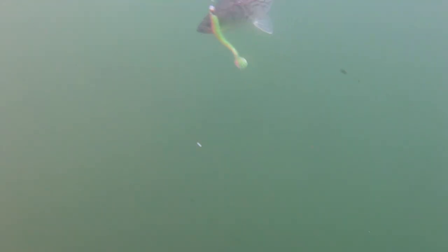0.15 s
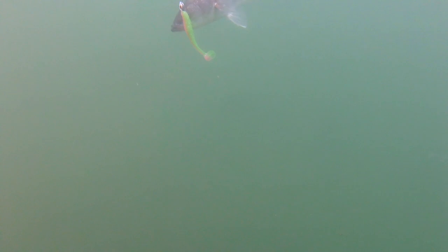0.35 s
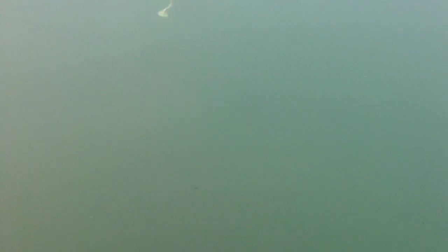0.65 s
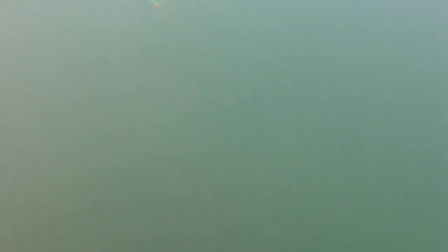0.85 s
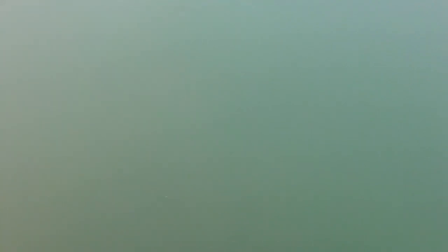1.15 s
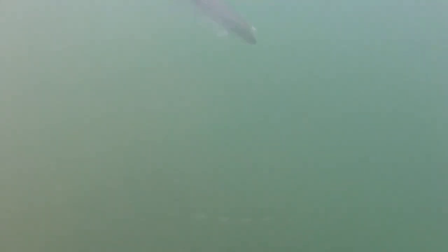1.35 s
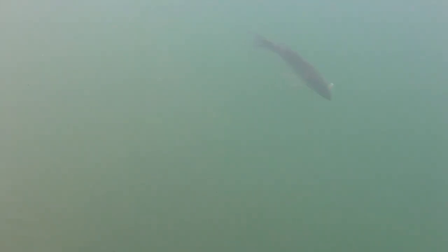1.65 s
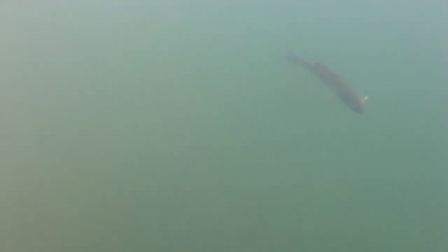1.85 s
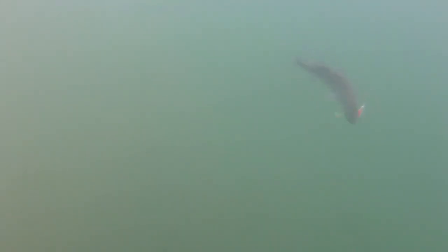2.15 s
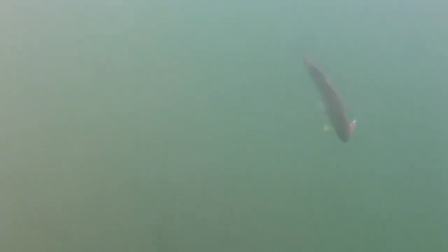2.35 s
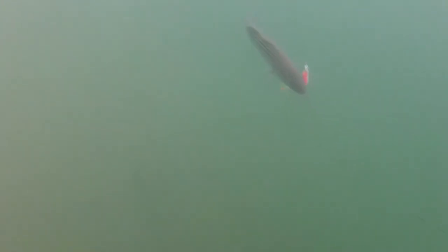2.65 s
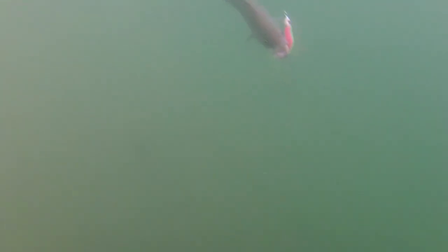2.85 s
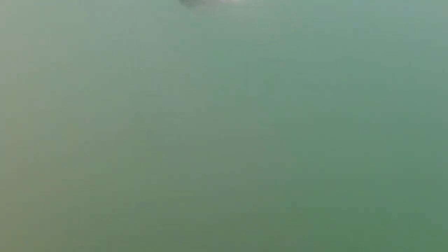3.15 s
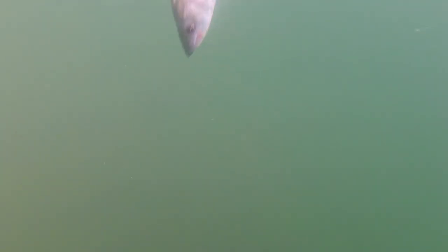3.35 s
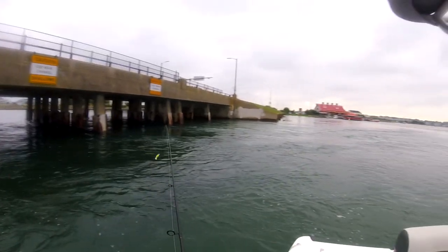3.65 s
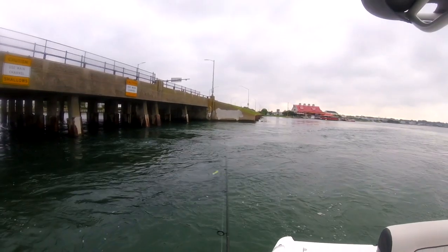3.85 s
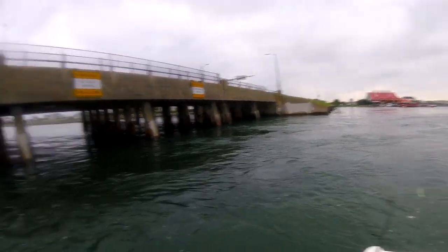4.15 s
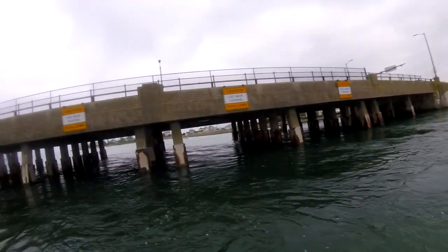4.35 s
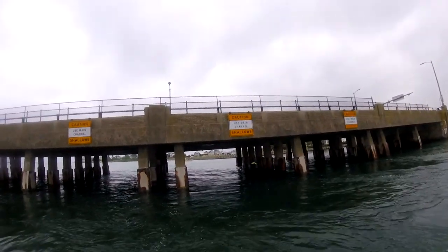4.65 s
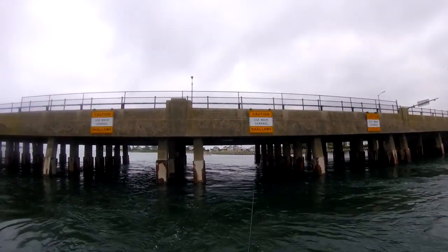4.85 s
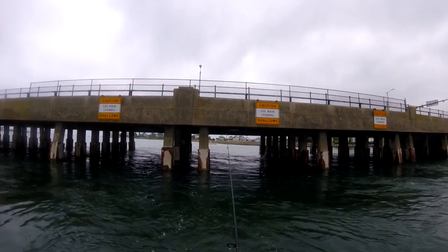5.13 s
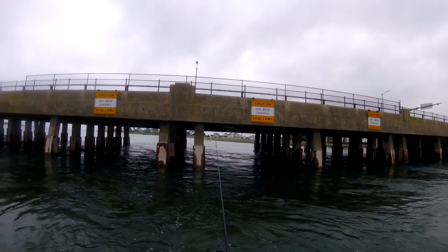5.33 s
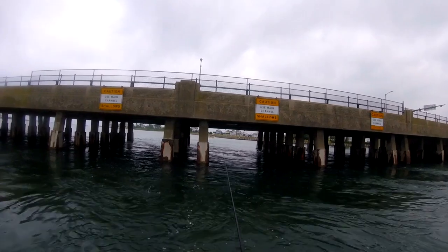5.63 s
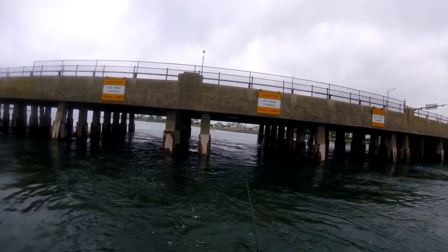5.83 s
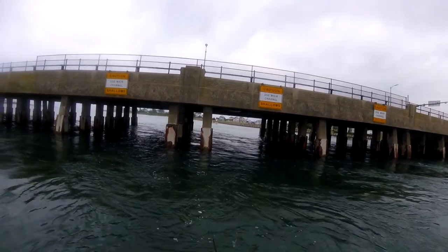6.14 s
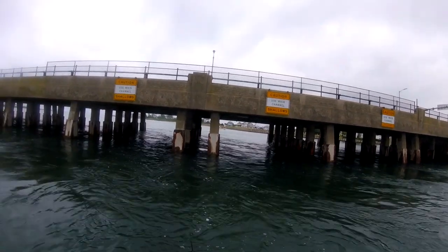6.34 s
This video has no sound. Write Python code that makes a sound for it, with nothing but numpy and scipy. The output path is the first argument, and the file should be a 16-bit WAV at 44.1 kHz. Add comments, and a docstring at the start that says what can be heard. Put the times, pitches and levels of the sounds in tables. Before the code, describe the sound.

The sound begins underwater, heard through a sealed camera housing towed behind a boat. An outboard motor hums with a deep, steady throb and light metallic ticking, while exhaust bubbles gurgle and swirling water rumbles. Two small dry ticks come near 1 second. From about 1.9 to 3.1 seconds a fish strikes the lure, making low thuds and sharp snaps as the rumble swells. The hardest snap lands at about 2.5 seconds, and the bubbling and ticking drop briefly after it.

At 3.5 seconds the sound cuts suddenly to the open deck. Wind rumbles on the microphone in short gusts, strongest until 4 seconds, and water washes along the hull. The motor hums faintly, and distant tyres on a bridge hold a thin, slowly sinking note. Light tackle clicks come around 3.6 and 5.8 seconds. Small splashes, soft spray and one dull plop fall between 4.6 and 5.8 seconds.

```python
"""First you hear an outboard motor humming and ticking under water, as it slowly tows a camera in a
sealed housing. Bubbles gurgle, swirling water buffets the housing, and a fish knocks at the lure.
Then, all at once, you are on deck by a bridge: wind rumbles on the microphone, water washes and
splashes, the motor hums faintly and tyres sing far off."""
import sys
import numpy as np
from scipy import signal
from scipy.fft import rfft, irfft, next_fast_len
from scipy.io import wavfile

SR = 44100
rng = np.random.default_rng(int(sys.argv[2]) if len(sys.argv) > 2 else 0)


def generate_wav(signal):
    """Clip the signal to [-1, 1] and save it as 16-bit WAV at the path in sys.argv[1]."""
    frames = np.transpose(np.atleast_2d(signal))
    scaled = np.clip(frames, -1, 1) * 32767
    pcm = np.round(scaled).astype(np.int16)
    wavfile.write(sys.argv[1], SR, pcm)


N = 286209
T = np.arange(N) / SR
SURFACE_S = 3.484  # the move from under water to the deck
DIP_WAKE_DB, DIP_TREBLE_DB = -7, -10.5  # how far the wake and the treble drop in dip()


def exhaust_hum(firings):
    """The exhaust hums through the water: a deep throb at the firing rate, with higher tones on top."""
    # tones of the hum: multiple_of_firing_rate, relative_db
    tones = [(1, 0.5), (2, -7.5), (3, -5), (5, -15), (6, -21.5), (7, -20.5), (8, -14), (9, -22),
             (10, -16.5), (12, -20.5), (13, -23.5)]
    # loudness of the lowest tone: time_s, level_db
    throb_levels = [(0, -19.5), (.33, -45), (.5, -21), (1.0, -26), (1.3, -17.5), (1.6, -25.5), (2.3, -24.5),
                    (2.9, -34.5), (3.48, -31)]
    throb = undb(curve(throb_levels)) * hum(firings, tones[:1], waver_db=1.5)
    overtones = undb(-21.5 + 0.76 * wake_db()) * hum(firings, tones[1:], waver_db=0.5)
    return throb + overtones


def engine_clatter(firings):
    """Valves tick and the engine block knocks, each stronger on every other firing."""
    # how the valves ring: pitch_hz, width_hz, relative_db
    valve_rings = [(2372, 80, 0), (2200, 200, -13), (2700, 100, -12), (3650, 260, -20)]
    # loudness of the valves: time_s, level_db
    valve_levels = [(0, -72.5), (.6, -71), (1.15, -58), (1.7, -59), (2.5, -64), (2.8, -67.5), (3.48, -58.5)]
    # how the block rings: pitch_hz, width_hz, relative_db
    block_rings = [(926, 83, 2.5), (1228, 45, 4.5), (1391, 55, -1), (1685, 39, -4.5), (2086, 64, -13.5),
                   (2710, 47, -13.5), (3010, 35, -18.5), (3850, 200, -30)]
    valve_db = curve(valve_levels) + DIP_TREBLE_DB * dip()
    valves = undb(valve_db) * rattle(firings, valve_rings, even_db=-4, odd_db=3, grit=1.3)
    knocks = undb(-51 + 0.8 * wake_db()) * rattle(firings, block_rings, even_db=-4, odd_db=-6, grit=1.2)
    return colour(valves + knocks, [(3800, -1), (4500, -15.5)])  # the housing muffles the treble


def gurgle(firings):
    """Exhaust bubbles burst in time with the firings and make the housing ring."""
    # tone of the bubbles: pitch_hz, relative_db
    tone = [(110, -27), (180, -18.5), (230, -10), (295, -6), (336, 1), (387, -4.5), (450, -4.5),
            (540, -6.5), (640, -17.5), (776, -24.5), (939, -23.5), (1100, -34.5), (1600, -43), (2400, -76)]
    # how the housing rings: pitch_hz, width_hz, boost_db
    rings = [(271.4, 18, 6.5), (331, 10, 0), (430.8, 13, 4), (538.5, 21, 5), (950, 88, 3), (1233, 67, -2.5),
             (1797, 130, 12)]
    bubbles = noise() * pulses(firings, decay=0.26, even_db=-3, odd_db=-3.5, scatter_db=1)
    return undb(-26 + wake_db()) * unit(colour(bubbles + 0.79 * noise(), tone, rings))


def buffeting():
    """Swirling water shoves the housing, harder while the fish chases the lure."""
    # tone of the rumble: pitch_hz, relative_db
    tone = [(10, -16.5), (22, 3.5), (35, -3), (60, 4.5), (100, 0.5), (160, 0), (200, -14.5), (300, -29),
            (500, -62)]
    chase_db = 4.5 * bump(2.3, width_s=0.4)
    return undb(-26.5 + 0.51 * wake_db() + chase_db) * shaped_noise(tone)


def line_tugs():
    """Each pull on the fishing line swells and shakes the housing at a low, unsteady pitch."""
    # pulls on the line: start_s, peak_db, pitch_hz, length_s
    tugs = [(1.924, -15.5, 43.12, 0.071), (1.926, -13.5, 128, 0.082), (2.44, -17, 139.4, 0.043),
            (2.469, -8.5, 48.6, 0.074), (2.597, -8, 139.4, 0.052), (2.598, -13.5, 30.5, 0.11),
            (2.64, -18, 167, 0.051), (3.026, -18.5, 205, 0.032), (3.09, -13.5, 163, 0.043)]
    out = np.zeros(N)
    shake = wander(140)
    for start_s, peak_db, pitch_hz, length_s in tugs:
        age = T - start_s
        swell = np.sin(np.pi * np.clip(age / length_s, 0, 1))
        out += undb(peak_db) * swell * np.sin(2 * np.pi * pitch_hz * age + 0.5 * shake)
    return out


def housing_ticks():
    """Single dry snaps sound against the housing."""
    # tone of one snap: pitch_hz, relative_db
    tone = [(300, -12.5), (900, 6.5), (2000, 0), (4000, -8), (8000, -14), (12000, -22.5), (15000, -12.5)]
    # snaps on the housing: start_s, peak_db
    ticks = [(0.833, -35.5), (1.0166, -38.5), (2.1041, -28.5), (2.393, -31), (2.5527, -19.5), (2.6165, -35),
             (2.6507, -38.5), (2.802, -47), (3.0016, -44), (3.102, -44)]
    impulse = 1.0 * (T == 0)
    snap = colour(impulse, tone)[:SR // 20]
    out = np.zeros(N)
    for start_s, peak_db in ticks:
        place(out, snap, start_s, peak_db)
    return out


def tackle_clicks():
    """Fishing tackle and drops ring briefly; the camera housing adds a bright edge."""
    # small clicks: start_s, peak_db, pitch_hz, decay_s
    clicks = [(3.164, -52, 1894, .003), (3.181, -38, 1860, 0.002), (3.623, -33.5, 5100, 0.0027),
              (3.636, -38, 6300, 0.0032), (3.647, -52, 7200, 0.0017), (4.25, -41, 2783, 0.0048),
              (4.979, -45.5, 6610, .002), (5.776, -34, 6570, 0.0031), (5.786, -41, 5627, .002),
              (5.799, -40, 2380, .002)]
    out = np.zeros(N)
    age = T[:SR // 20]
    for start_s, peak_db, pitch_hz, decay_s in clicks:
        burst = rng.standard_normal(len(age)) * np.exp(-age / decay_s)
        width_hz = pitch_hz / 4.1
        ring = band(band(burst, pitch_hz, width_hz), pitch_hz, width_hz)
        hardness = pitch_hz / 5000  # low rings have little edge
        edge = 0.48 * hardness * band(burst, 6600, 600) + 0.19 * hardness ** 2 * band(burst, 8800, 4000)
        place(out, ring + edge * np.exp(-age / 0.0026), start_s, peak_db)
    return out


def wind():
    """An unsteady breeze with short gusts rumbles on the microphone."""
    # tone of the wind: pitch_hz, relative_db
    tone = [(10, -26), (25, 16), (50, 17.5), (75, 18), (105, 7), (200, 4.5), (400, -37)]
    # puffs of wind: middle_s, level_db, half_length_s
    gusts = [(3.625, -25.5, 0.033), (3.703, -23.5, 0.02), (3.814, -25.5, 0.017), (3.996, -22, .022),
             (4.616, -30.5, 0.05), (5.169, -29.5, 0.039), (5.305, -28.5, 0.019), (5.625, -26.5, 0.029),
             (5.787, -32.5, .05)]
    puffs = sum(undb(db) * bump(middle_s, width_s) for middle_s, db, width_s in gusts)
    breeze = undb(-35 + 2.5 * wander(8))
    return (breeze + puffs) * shaped_noise(tone)


def hull_wash():
    """Water washes along the hull."""
    # tone of the wash: pitch_hz, relative_db
    tone = [(60, 10), (140, 25), (170, 18.5), (205, 11.5), (300, 13.5), (400, 10.5), (480, 4), (700, -0.5),
            (850, 2), (1200, -4), (1700, -8.5), (2200, -19.5), (4000, -26)]
    return undb(-33.5 + 0.5 * wander(13)) * shaped_noise(tone)


def spray():
    """A spray of droplets slowly swells once, bringing a thin fizz with it."""
    # tone of the spray: pitch_hz, relative_db
    tone = [(900, -31), (2000, 7), (2800, 6.5), (3800, 1.5), (5000, -1), (6000, -1), (6500, 8), (7200, 0),
            (9400, -4), (10200, -10), (13500, -9), (15000, -13), (15800, 3.5)]
    fizz_tone = [(9000, -23), (10500, -10), (11200, -2), (12000, -11), (13500, -16)]
    swell = bump(5.23, width_s=0.6)
    droplets = unit(grains(per_second=250, spread_db=7))
    level_db = -59 + 1.5 * swell + 0.5 * wander(10)
    patter = undb(level_db) * unit(colour(noise() + 0.47 * droplets, tone))
    return patter + undb(-73) * swell * shaped_noise(fizz_tone)


def splashes():
    """Each splash is a dense shower of drops that quickly rises and fades."""
    # bursts of drops: middle_s, level_db, rise_and_fade_s
    bursts = [(4.669, -49.5, 0.015), (4.674, -55.5, 0.13), (5.348, -53, 0.0072), (5.786, -52, 0.011),
              (5.807, -50.5, 0.013)]
    tone = [(600, 0), (2500, 5), (4500, -1), (6800, -1), (10000, -14), (15000, -16)]
    loudness = sum(undb(db) * np.exp(-np.abs(T - middle_s) / fade_s) for middle_s, db, fade_s in bursts)
    return loudness * unit(colour(grains(per_second=3000, spread_db=2), tone))


def hull_slap(start_s, level_db, decay_s):
    """A small wave slaps the hull with a dull, quickly fading plop."""
    tone = [(300, -23), (550, 5), (1000, -4), (1300, -10), (2000, -24)]
    age = np.maximum(T - start_s, 0) / decay_s
    return undb(level_db) * age * np.exp(1 - age) * shaped_noise(tone)


def deck_hum(firings):
    """The motor hums faintly through the open air."""
    # tones of the hum: multiple_of_firing_rate, level_db
    tones = [(1, -44), (2, -35), (3, -50.5), (3.5, -46.5), (6.08, -42), (7, -56.5)]
    return hum(firings, tones, waver_db=1.46)


def tyres():
    """Tyres sing on the bridge: a fluttering note that sinks steadily."""
    pitch_hz = 858 - 23 * (T - SURFACE_S)
    angle = 2 * np.pi * np.cumsum(pitch_hz) / SR
    return undb(-55.5) * (wander(30) * np.sin(angle) + wander(30) * np.cos(angle))


def faint_hiss():
    """Over a soft hiss, a fine crackle and a flickering, very high hiss rise and fall with the rumble."""
    # tone of the very high hiss: pitch_hz, relative_db
    high_tone = [(9000, -39.5), (13000, -24), (14500, -15), (15200, -7), (15600, 9.5), (16000, -14.5)]
    # tone of the soft hiss: pitch_hz, relative_db
    soft_tone = [(1000, 3), (3500, 0), (4500, -9.5), (6000, -8), (6500, 6.5), (7200, -2), (9500, -4),
                 (10200, -17.5), (13000, -6), (16000, -4.5)]
    crackle_tone = [(1000, -4.5), (4000, -3), (9000, -5.5), (13000, -1.5), (15500, 6.5)]
    crackle = undb(-68) * unit(colour(grains(per_second=90, spread_db=4), crackle_tone))
    high_hiss = undb(-62.5 + 1.5 * wander(60)) * shaped_noise(high_tone)
    soft_hiss = undb(-65.5 + DIP_TREBLE_DB * dip()) * shaped_noise(soft_tone)
    return undb(0.72 * wake_db()) * (crackle + high_hiss) + soft_hiss


def wake_db():
    """Strength of the churned water at the housing, with the dip included."""
    # strength of the wake: time_s, relative_db
    strength = [(.1, -4), (.55, 2), (.87, 2.5), (1.25, 2), (1.65, -4), (1.9, -3), (2.3, 2), (2.75, -1.5),
                (3.15, -0.5), (3.48, -2.5)]
    return curve(strength) + DIP_WAKE_DB * dip()


def dip(start_s=2.555, fall_s=0.024, recover_s=1.52):
    """After the hardest knock the sound drops and creeps back; this is the depth, from 0 to 1."""
    age = T - start_s
    return np.clip(age / fall_s, 0, 1) * np.clip(1 - age / recover_s, 0, 1)


def hum(firings, tones, waver_db):
    """Pure tones at multiples of the firing rate, each wavering in loudness by itself."""
    out = np.zeros(N)
    for multiple, db in tones:
        height = np.sqrt(2) * undb(db + waver_db * wander(4.8))
        out += height * np.sin(2 * np.pi * (multiple * firings + rng.random()))
    return out


def rattle(firings, rings, even_db, odd_db, grit):
    """A loosely timed blow at each firing, followed by a gritty burst, makes metal ring."""
    loose = firings + 0.04 * wander(25)
    count = loose.astype(int)
    blows = unit(np.diff(count, prepend=0) * firing_strength(count, even_db, odd_db, scatter_db=3.5))
    drive = blows + grit * noise() * pulses(loose, 0.12, even_db, odd_db, scatter_db=3)
    ringing = sum((-1) ** k * undb(db) * band(drive, hz, width) for k, (hz, width, db) in enumerate(rings))
    return unit(ringing)


def pulses(firings, decay, even_db, odd_db, scatter_db):
    """Loudness that jumps at each firing and fades; decay is a share of the gap between firings."""
    age = firings % 1
    strength = firing_strength(firings.astype(int), even_db, odd_db, scatter_db)
    return unit(strength * age * np.exp(-age / decay))


def firing_strength(count, even_db, odd_db, scatter_db):
    """Two unequal cylinders take turns, and each firing varies by chance."""
    chance = rng.standard_normal(N // 100)[count]
    return undb(scatter_db * chance + np.where(count % 2, odd_db, even_db))


def colour(x, tone, rings=()):
    """Filter x by a tone (pitch_hz, relative_db) and rings (pitch_hz, width_hz, boost_db)."""
    size = next_fast_len(N + SR // 4) * 2
    hz = np.arange(size // 2 + 1) * SR / size + 1
    tone_hz, tone_db = np.transpose(tone)
    db = np.interp(np.log(hz), np.log(tone_hz), tone_db)
    db -= 24 * np.log2(np.maximum(hz / tone_hz[-1], 1))  # steep fall above the last point
    for pitch_hz, width_hz, boost_db in rings:
        db += boost_db / (1 + (2 * (hz - pitch_hz) / width_hz) ** 2)
    # make the filter ring only after a sound, never before it
    cepstrum = irfft(np.log(undb(db)))
    cepstrum[1:size // 2] *= 2
    cepstrum[size // 2 + 1:] = 0
    return irfft(rfft(x, size) * np.exp(rfft(cepstrum)))[:N]


def band(x, pitch_hz, width_hz):
    """Let x ring around one pitch."""
    return signal.lfilter(*signal.iirpeak(pitch_hz, pitch_hz / width_hz, fs=SR), x)


def grains(per_second, spread_db):
    """Tiny pops of uneven size at random times."""
    hits = rng.random(N) < per_second / SR
    return hits * np.sign(noise()) * undb(spread_db * np.clip(noise(), -2, 2))


def wander(rate_hz):
    """A smooth random drift that changes about rate_hz times a second."""
    hz = np.arange(N // 2 + 1) * SR / N
    return unit(irfft(rfft(noise()) * np.exp(-(hz / rate_hz) ** 2), N))


def place(out, sound, start_s, peak_db):
    """Add a short sound to out."""
    out[int(start_s * SR):][:len(sound)] += undb(peak_db) * sound / np.abs(sound).max()


def bump(middle_s, width_s):
    """A smooth rise to 1 and back."""
    return np.exp(-((T - middle_s) / width_s) ** 2)


def curve(points):
    """Join (time_s, value) points with straight lines."""
    return np.interp(T, *np.transpose(points))


def shaped_noise(tone):
    return unit(colour(noise(), tone))


def noise():
    return rng.standard_normal(N)


def unit(x):
    """Scale x to an average power of 1."""
    return x / np.sqrt(np.mean(x ** 2))


def undb(db):
    """Turn decibels into a multiplier."""
    return 10 ** (np.asarray(db) / 20)


def scene():
    """Under water first, then on deck, with the same motor running."""
    # motor speed: time_s, firing_rate_hz
    speed = [(.1, 42.34), (.45, 43.69), (1.3, 44.22), (1.6, 43.28), (2.8, 42.42), (3.35, 42.54),
             (3.8, 43.46), (5.3, 44.17), (5.7, 44.15), (6.49, 42.27)]
    firing_hz = curve(speed) * (1 + 0.00567 * wander(8.9))
    firings = np.cumsum(firing_hz) / SR  # running count
    below = exhaust_hum(firings) + engine_clatter(firings) + gurgle(firings)
    below += buffeting() + faint_hiss() + line_tugs() + housing_ticks()
    deck = wind() + hull_wash() + spray() + splashes()
    deck += hull_slap(start_s=5.453, level_db=-40, decay_s=0.0061) + tyres() + deck_hum(firings)
    on_deck = np.clip((T - SURFACE_S) / 0.004, 0, 1)
    return ((1 - on_deck) * below + on_deck * deck + tackle_clicks())[None]


def record(dry):
    """The camera cuts off the highest treble."""
    top_hz = 15750
    return signal.sosfilt(signal.ellip(10, 0.2, 80, top_hz, fs=SR, output="sos"), dry)


dry = scene()
out = record(dry)
generate_wav(out)
```